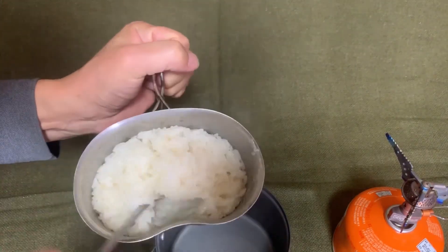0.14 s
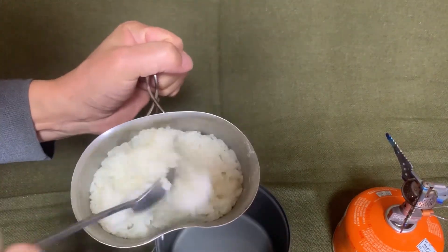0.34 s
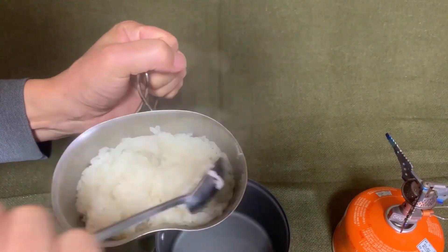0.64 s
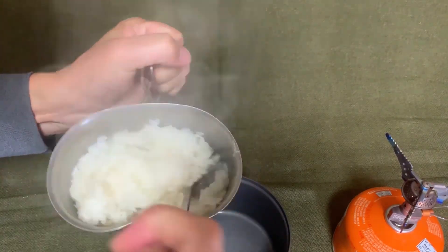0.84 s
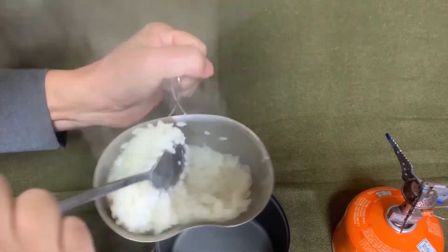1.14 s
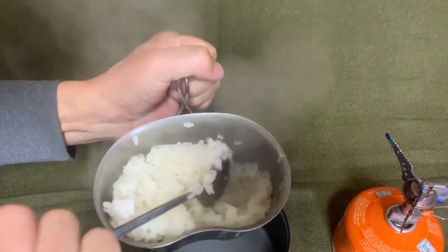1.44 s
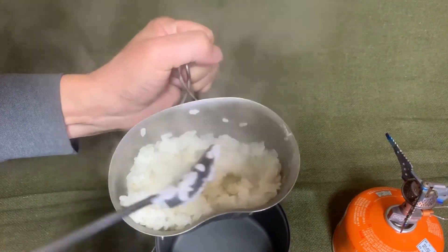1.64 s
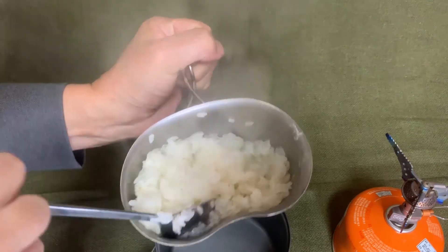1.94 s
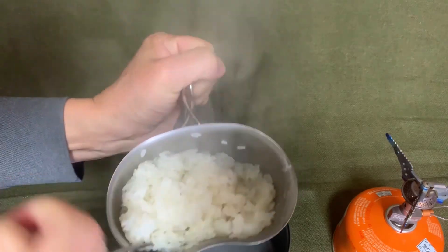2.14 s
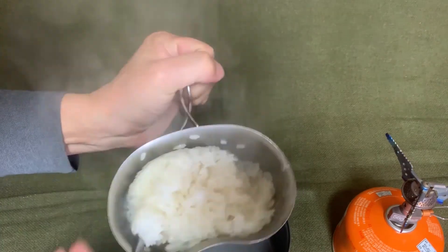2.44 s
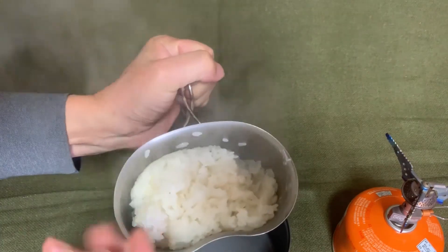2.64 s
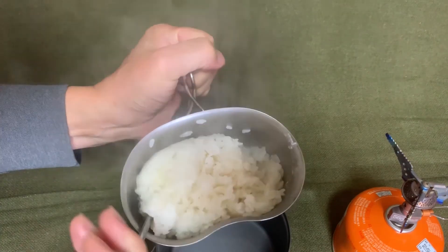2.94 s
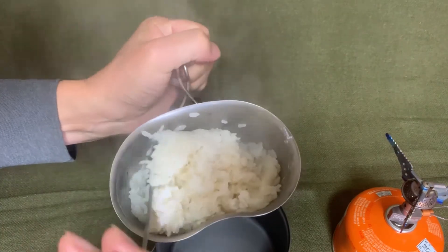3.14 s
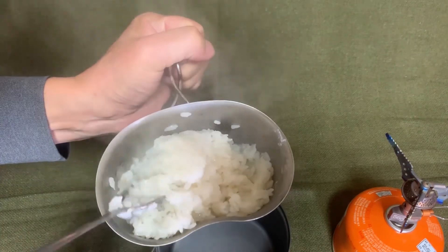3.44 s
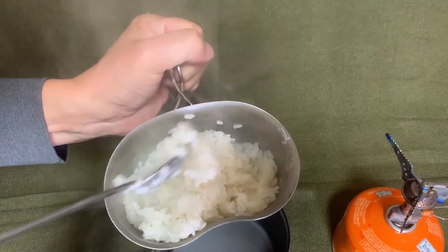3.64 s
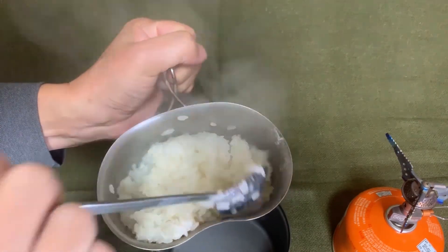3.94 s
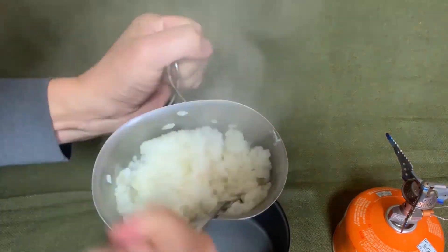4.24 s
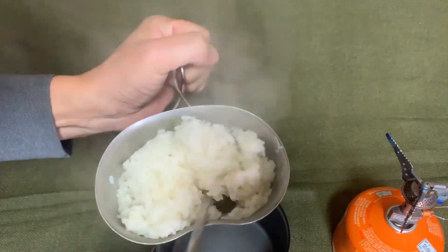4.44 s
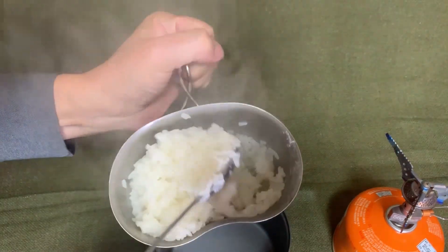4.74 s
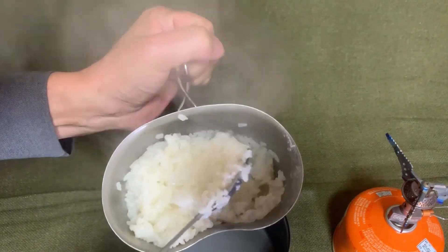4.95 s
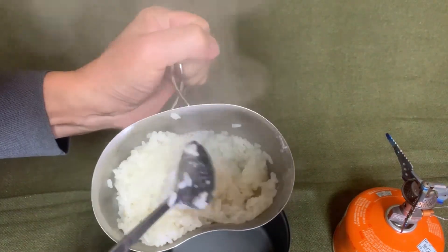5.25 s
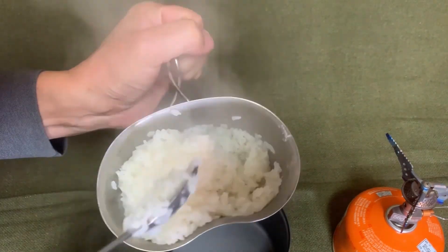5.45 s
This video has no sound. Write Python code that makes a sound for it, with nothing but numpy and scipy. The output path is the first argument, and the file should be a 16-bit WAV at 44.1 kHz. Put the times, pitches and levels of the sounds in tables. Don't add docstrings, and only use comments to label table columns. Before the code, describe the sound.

A spoon clinks hard on a rice-filled metal camping cup, the handle ticks, the base knocks, air hisses out sharply, then a lid snaps shut.

```python
import sys
import numpy as np
from scipy import signal
from scipy.fft import rfft, irfft
from scipy.io import wavfile
from scipy.ndimage import uniform_filter1d

SR = 44100
rng = np.random.default_rng(int(sys.argv[2]) if len(sys.argv) > 2 else 0)


def generate_wav(sig):
    pcm = np.round(np.clip(np.atleast_2d(sig).T, -1, 1) * 32767).astype(np.int16)
    wavfile.write(sys.argv[1], SR, pcm)


def gain_from_db(level_db):
    decades = np.asarray(level_db, float) / 20
    return 10 ** decades


N = 246953
TIME = np.arange(N) / SR


def at_hz(points, hz):
    table = np.array(points)
    return np.interp(np.log(hz), np.log(table[:, 0]), table[:, 1])


def rms_one(x):
    return x / np.sqrt(np.mean(x ** 2) + 1e-20)


def colour(x, spectrum, size=8192):
    level_db = at_hz(spectrum, np.linspace(1, SR / 2, size // 2 + 1))
    cepstrum = irfft(np.log(gain_from_db(level_db)))
    cepstrum[1:size // 2] *= 2
    response = irfft(np.exp(rfft(cepstrum[:size // 2], size)))
    return signal.fftconvolve(x, response / np.linalg.norm(response))[:N]


def drift(rate):
    r = np.exp(-32 * np.pi * rate / SR)
    slow = signal.lfilter([1], [1, -2 * r, r * r], rng.standard_normal(N // 16 + 3001))[3000:]
    return np.interp(np.arange(N) / 16, np.arange(len(slow)), rms_one(slow))


def high_pass(x, order, hz):
    return signal.sosfilt(signal.butter(order, hz, "high", fs=SR, output="sos"), x)


def ring(push, hz, t60):
    r = gain_from_db(-60 / (np.clip(t60, .002, 2) * SR))
    w = 2 * np.pi * hz / SR
    return signal.lfilter([.5, 0, -.5], [1, -2 * r * np.cos(w), r * r], push + 1e-18)


def clicks(times, db):
    out = np.zeros(N)
    np.add.at(out, (np.array(times) * SR).astype(int), gain_from_db(db))
    return out


def burst(x, t60):
    envelope = signal.lfilter([1], [1, -gain_from_db(-60 / (t60 * SR))], x + 1e-18)
    return envelope * rng.standard_normal(N)


def soft(x, hz):
    r = np.exp(-2 * np.pi * hz / SR)
    return signal.lfilter([(1 - r) ** 2], [1, -2 * r, r * r], x)


def strike(hits, modes, damped=False, spread_db=2.0):
    s, db = np.transpose(hits)[:2]
    luck = rng.standard_normal((len(s), 14))
    most_cycles = 55 if damped else np.inf
    out = np.zeros(N)
    for k, (hz, level_db, t60) in enumerate(modes):
        push = clicks(s, db + level_db + spread_db * luck[:, k])
        out += (-1) ** k * ring(push, hz, min(t60, most_cycles / hz))
    return out


def rattle(hits, modes, slip_s):
    s, db = np.transpose(hits)[:2]
    grains = burst(clicks(s, db), slip_s) / np.sqrt(slip_s * SR / 14)
    return sum(gain_from_db(level_db) * ring(grains, hz, t60) for hz, level_db, t60 in modes)


def crack(hits, spectrum, t60):
    s, *db = np.transpose(hits)
    return colour(burst(clicks(s, db[-1]), t60), spectrum)


def spread(hits, spectrum, gain_db):
    s, *db = np.transpose(hits)
    return colour(clicks(s[1:2], db[-1][1:2] + gain_db), spectrum)


def swell(start, rise, hold, sag_db, fall_db):
    t = TIME - start
    late = np.maximum(t - rise, 0)
    drop_db = sag_db * np.minimum(late, hold) + fall_db * np.maximum(late - hold, 0)
    return np.clip(t / rise, 0, 1) ** 2 * gain_from_db(-drop_db)


# (frequency [Hz], t60 [s])
ROOM_T60 = [(100, .3), (600, .33), (1300, .4), (2500, .32), (5000, .32), (8000, .3), (15000, .29)]


def room(x, gap_s=.005):
    t, tail = TIME[:SR // 2], 0
    edges = np.geomspace(60, 18000, 10)
    for low, high in zip(edges, edges[1:]):
        band_pass = signal.butter(2, [low, high], "band", fs=SR, output="sos")
        band = signal.sosfilt(band_pass, rng.standard_normal(len(t)))
        tail = tail + band * gain_from_db(-60 * t / at_hz(ROOM_T60, np.sqrt(low * high)))
    tail = tail * np.clip(t / gap_s - 1, 0, 1)
    return signal.fftconvolve(x, tail / np.linalg.norm(tail))[:N]


# (frequency [Hz], level [dB per Hz])
FLOOR = [(18, -50), (30, 6), (124, -6), (221, -11.5), (328, -11), (473, -13.5), (569, -13), (632, -14),
         (1430, -23.5), (8080, -34), (11400, -43.5), (14400, -37), (16000, -40)]
# (frequency [Hz], level [dB rms])
HUM = [(172.3, -69.5), (328.4, -66), (570.6, -71.5), (689.1, -76), (1319, -80.5), (3095, -82.5),
       (6998, -84.5), (8070, -87), (14153, -101)]
# (frequency [Hz], level [dB rms])
BEAT = [(44.51, -69), (53.01, -73.5), (57.35, -67), (114.67, -65.5), (120.78, -63.5)]


def background():
    out = gain_from_db(-59.5) * rms_one(colour(rng.standard_normal(N), FLOOR))
    for hz, db in HUM:
        level = gain_from_db(db + 0.5 + 2.6 * drift(7.9))
        out += level * np.sin(2 * np.pi * hz * TIME + 0.09 * drift(5.0))
    for hz, db in BEAT:
        level = gain_from_db(db + 4.0 + 0.93 * drift(7.0))
        out += level * np.cos(2 * np.pi * hz * (TIME - .067))
    return out


# (start [s], length [s], dull rub [dB], bright rub [dB])
RUBS = [(-.05, 0.076, -65, -63), (0.125, 0.16, -70, -85), (0.425, 0.27, -88, -74), (0.777, 0.2, -77, -75),
        (0.888, 0.11, -75, -64.5), (1.602, 0.061, -69, -74), (1.804, .03, -73, -73),
        (1.867, 0.03, -64.5, -56.5), (2.002, .08, -72, -74), (2.32, 0.17, -62.5, -63),
        (2.647, 0.14, -66.5, -74), (2.784, 0.29, -64.5, -76.5), (3.022, 0.19, -74, -66),
        (3.264, 0.12, -79, -72), (4.43, 0.11, -77, -74), (4.74, .07, -73.5, -91), (5.21, .05, -81, -83)]
# (frequency [Hz], level [dB per Hz])
DULL = [(410, -31), (700, -5), (848, -1.5), (1290, 1.5), (1580, -1.5), (2550, -1.5), (9000, -19),
        (11700, -43), (19800, -120)]
BRIGHT = [(1760, -38.5), (3000, -4.5), (4760, -3), (6280, 1), (8100, -1.5), (8800, 0.5), (12000, -13),
          (13000, -6), (15600, -5.5)]
# (start [s], end [s], level [dB], lines [Hz])
SING = [
    (.405, .59, -80, [7750, 7900, 9660]),
    (2.335, 2.49, -76, [5400, 7100, 10800, 12800, 13200]),
]


def rubbing():
    dull = colour(rng.standard_normal(N) * gain_from_db(2.0 * drift(40)), DULL)
    bright = colour(rng.standard_normal(N) * gain_from_db(2.0 * drift(40)), BRIGHT)
    out, rise_s = np.zeros(N), 0.038
    for s, length, dull_db, bright_db in RUBS:
        stroke = swell(s, rise_s, max(length - rise_s, 0), sag_db=35, fall_db=152.5)
        out += stroke * (gain_from_db(dull_db) * dull + gain_from_db(bright_db) * bright)
    for start, end, db, lines in SING:
        gate = np.clip(np.minimum(TIME - start, end - TIME) / 0.014, 0, 1)
        grit = rng.standard_normal(N)
        out += gain_from_db(db) * gate * sum(rms_one(ring(grit, hz, t60=0.028)) for hz in lines)
    return out


# (start [s], length [s], from [Hz], to [Hz], level [dB])
WHISTLES = [
    (3.84, .06, 4500, 5200, -61),
    (3.825, .075, 3250, 3500, -61),
    (3.83, 0.07, 2150, 2450, -63),
    (3.78, 0.1, 1150, 1400, -57),
    (4.55, .06, 8700, 7700, -80),
    (4.56, 0.034, 11000, 10400, -82),
]


def whistle():
    out = np.zeros(N)
    rough = drift(200)
    for k, (s, length, from_hz, to_hz, db) in enumerate(WHISTLES):
        along, first = np.linspace(0, 1, int(length * SR)), int(s * SR)
        phase = 2 * np.pi * np.cumsum(from_hz + (to_hz - from_hz) * along) / SR
        own = rough[k * SR // 2:][:len(along)]
        fade = np.sqrt(np.abs(np.sin(np.pi * along)))
        out[first:first + len(along)] += gain_from_db(db) * fade * own * np.cos(phase)
    return out


# (start [s], peak [dB], rise [s], hold [s])
PUFFS = [
    (3.638, -26, 0.00055, 0.081),
    (3.81, -55, 0.064, 0.058),
    (3.895, -39.5, 0.012, 0.033),
]
# (frequency [Hz], level [dB per Hz])
AIR = [(90, -37), (180, -17.5), (340, -4), (560, -4), (850, -8.5), (1150, -1.5), (1570, 2), (3050, 2),
       (8900, -5.5), (10500, -17.5), (12000, -24), (15600, -28.5)]
# (frequency [Hz], level [dB], t60 [s])
SHEET = [(950, -11, .04), (1250, -9, .04), (2350, -6, .03), (3400, -6, .03), (3670, -10, .02),
         (4250, -6, .03), (4750, -4, .03), (5300, -7, .03), (6490, -4, .03), (8500, -5, .02),
         (10400, -7, .02), (12700, -8, .02)]


def puff():
    flow = np.zeros(N)
    for s, db, rise, hold in PUFFS:
        flow += gain_from_db(db) * swell(s, rise, hold, sag_db=63, fall_db=172)
    s, full_db = PUFFS[0][:2]
    lead_s = 0.0019
    flow = flow + gain_from_db(full_db - 18) * (TIME > s - lead_s) * (TIME < s + lead_s)
    below_db = np.clip(20 * np.log10(flow + 1e-9) - full_db, -26, 0)
    grain = gain_from_db(0.5 * drift(430) + 0.78 * drift(71))
    air = rms_one(colour(rng.standard_normal(N) * grain, AIR))
    top = high_pass(air, 2, 10500)
    sheet = np.zeros(N)
    for hz, level_db, t60 in SHEET:
        sheet += gain_from_db(level_db + 4.0 * drift(1.6)) * ring(air, hz, t60)
    bright = gain_from_db(3 + 0.41 * below_db) * top
    singing = gain_from_db(-14 - 0.23 * below_db) * rms_one(sheet)
    return flow * (air + bright + singing)


# (time [s], level [dB])
CATCH = [
    (3.9075, -50),
    (3.9120, -44.5),
    (3.9250, -55),
    (3.9285, -39),
    (3.9460, -59),
    (3.9650, -63),
]
# (frequency [Hz], level [dB], t60 [s])
LATCH = [(2288, -5, .015), (3725, -4, .015), (4300, -2, .015), (4732, -3, .015), (5173, -9, .015),
         (6600, -5, .022), (8425, -8, .02), (8839, -4, .025), (10300, -6, .025), (11430, -14, .02),
         (12690, -8, .02), (13610, -12, .025)]


def catch():
    return rattle(CATCH, LATCH, slip_s=0.015)


# (time [s], peak level [dB])
THUMPS = [(3.639, -38), (3.660, -45), (3.690, -36), (3.9005, -42), (3.912, -39.5), (3.940, -42.5),
          (3.975, -43.5), (4.005, -53), (4.035, -57)]
# (frequency [Hz], level [dB], t60 [s])
HOLLOW = [(265, -7.5, 0.042), (442, -1.5, 0.034), (625, 0.5, 0.023), (944.4, -2.5, 0.14),
          (1158, -1.5, 0.066), (1357, 4, 0.05)]


def thump():
    return soft(strike(THUMPS, HOLLOW), hz=1490)


# (time [s], grit level [dB], ring against grit [dB], rebound against first touch [dB])
NOTCH_OUT = [(0.638, -47.5, -5.5, -13), (1.273, -48, -9.5, -1.5), (2.0617, -47.5, -11.5, -8.5),
             (4.3622, -47, -6.5, -7), (4.8255, -53, -7, 5)]
NOTCH_IN = [(0.0044, -50, -10, -26), (0.7262, -50, -15, 1.5), (1.382, -43.5, -21, -12),
            (2.189, -48, -11.5, -16), (4.415, -48, -16, -5), (4.8984, -46.5, -16, -7)]
STRAY = [(0.6774, -53, -33, -32), (1.8262, -75, -23, -30), (2.2872, -49.5, -22, 4), (2.3204, -72, -19, -30),
         (4.6644, -77.5, -14, -29), (5.243, -66.5, -9, -30), (5.5874, -49.5, -20, -27)]
OUT_SHARES = [-17.5, -0.8, -30, -26]
IN_SHARES = [5, -12, -2, 1]
STRAY_SHARES = [-15, -12, 6, 4]
# (frequency [Hz], t60 [s])
WIRE = [(5350, .01), (8080, .03), (12300, .01), (14650, .015)]
# (frequency [Hz], level [dB per Hz])
TICK_CRACK = [(880, -55), (1500, -13.5), (2500, -9), (3620, -8.5), (5410, -4.5), (9750, -8), (14900, -27),
              (15600, -9)]


def handle():
    touches = []
    for rows, shares in [(NOTCH_OUT, OUT_SHARES), (NOTCH_IN, IN_SHARES), (STRAY, STRAY_SHARES)]:
        for s, db, ring_db, rebound_db in rows:
            wire_db = ring_db + np.array(shares)
            touches.append((s, db, *(wire_db - 2.5)))
            touches.append((min(s + .012, TIME[-1]), db + rebound_db, *wire_db))
    s, db, *shares = np.transpose(touches)
    slip_t60 = .13
    out = colour(burst(soft(clicks(s, db - 12.5), hz=202), slip_t60), TICK_CRACK)
    for share, (hz, t60) in zip(shares, WIRE):
        rub = burst(soft(clicks(s, db + share - 15), hz=149), 0.46 * slip_t60)
        out += ring(rub, hz, t60)
    return out


# (time [s], ring level [dB], grit level [dB])
TAPS = [
    (1.4710, -40, -48),
    (1.4770, -55, -39.5),
    (1.4860, -55, -44),
    (1.4980, -60, -50),
    (1.5100, -61, -50),
    (1.5200, -70, -58),
]
# (frequency [Hz], level [dB], t60 [s])
SPOON = [(5250, -8, .008), (5520, -4, 0.012), (5900, -5, .01), (6309, -10, 0.012), (7300, -10, .008),
         (7919, 5, 0.035), (8656, -8, 0.02), (9300, -9, 0.02), (9835, -7, .015), (11220, -16, 0.015),
         (13560, -12, .012), (14590, -18, .012)]
# (time [s], ring level [dB], grit level [dB])
SKID = [
    (1.5715, -55, -60),
    (1.5740, -50, -56),
    (1.5765, -45, -50),
    (1.5785, -44, -50),
    (1.5870, -56, -60),
]
# (frequency [Hz], level [dB], t60 [s])
SKID_RING = [(5300, -8, .008), (6412, -13, .01), (7897, 1, .015), (8210, -1, .015), (8651, -2, .015),
             (9825, -7, .008), (10200, -5, .01), (12070, -12, .008), (13000, -7, .008), (14400, -12, .008)]
# (frequency [Hz], level [dB per Hz])
SPOON_CRACK = [(880, -47), (1500, -14), (4300, -34), (5300, -21), (6850, -15), (7930, -6), (10300, -12),
               (11500, -14), (15600, -23)]


def spoon_taps():
    rings = rattle(TAPS, SPOON, slip_s=0.03) + rattle(SKID, SKID_RING, slip_s=0.01)
    return rings + crack(TAPS + SKID, SPOON_CRACK, t60=0.019)


# (time [s], peak level [dB])
SHUDDERS = [
    (1.078, -32),
    (2.33, -37),
]


def shudder():
    table_top = [(46.5, -8.0, 0.67), (62, -8.0, .3)]   # (frequency [Hz], level [dB], t60 [s])
    return soft(strike(SHUDDERS, table_top), hz=89.3)


# (time [s], peak level [dB])
KNOCKS = [
    (2.3071, -18),
    (2.3087, -19),
    (2.3219, -17),
]
# (frequency [Hz], level [dB], t60 [s])
BASE = [(459, -8, 0.043), (647, 2.5, 0.033), (302, -9, 0.069), (170, -10.5, 0.072), (394, -12, 0.088),
        (1280, -29, 0.16), (673, -25.5, 0.34), (775, -22.5, 0.27), (540, -29, 0.088), (640, -37, .3)]
# (time [s], peak level [dB])
BUMPS = [(.665, -52), (1.582, -45), (1.47, -54), (2.09, -54), (2.47, -50), (4.44, -58)]
# (frequency [Hz], level [dB], t60 [s])
NUDGE = [(570, -10, .05), (722, -1, .09), (980, -14, .03)]
# (time [s], level [dB])
KNOCK_GRIT = [
    (2.3060, -39),
    (2.3205, -42.5),
]
# (frequency [Hz], level [dB per Hz])
RIM_TAIL = [(290, -44), (500, 1), (864, -8), (1090, 3), (1510, -9.5), (3920, 4), (5860, -13), (6300, 0.5),
            (11700, -9), (15600, -4)]
# (frequency [Hz], level [dB], t60 [s])
LANDING = [(1690, -20, 0.045), (2540, 3, .02), (3700, -9, 0.036), (5260, -5, 0.047), (6950, -6, 0.03)]


def knock():
    base = soft(strike(KNOCKS, BASE, spread_db=1.0), hz=1210)
    nudges = soft(strike(BUMPS, NUDGE), hz=930)
    click = crack(KNOCK_GRIT, RIM_TAIL, t60=0.0051)
    chime = gain_from_db(-13) * strike(KNOCK_GRIT, LANDING)
    return base + nudges + click + chime


# (time [s], ring level [dB], grit level [dB])
SNAPS = [
    (5.3487, -21, -14),
    (5.3492, -18, -12),
    (5.3501, -11, -12),
    (5.3608, -22, -34),
    (5.3695, -26, -26),
    (5.3780, -28, -30),
]
# (frequency [Hz], level [dB], t60 [s])
LID = [(324, -18, 0.02), (650, -13.5, 0.013), (1237, -11, 0.04), (1365, -4, 0.018), (1790, -8, 0.012),
       (2640, -7, 0.008), (3670, -10, 0.008), (4160, -11, 0.012), (4890, -16, 0.0064), (6500, -10, 0.006),
       (8050, -17, .004), (9580, -11, .005), (10040, -13, .005), (13200, -13, .005)]
# (frequency [Hz], level [dB per Hz])
LID_CRACK = [(240, -64), (400, -40), (1300, -1), (1900, -3), (2640, 0), (5590, -6), (7250, -12), (9600, -2),
             (11500, -8), (15600, -8)]


def lid_snap():
    rings = strike(SNAPS, LID, damped=True, spread_db=1.0)
    sharp = gain_from_db(-1.0) * crack(SNAPS, LID_CRACK, t60=0.0049)
    return rings + sharp + gain_from_db(-13.5) * crack(SNAPS, LID_CRACK, t60=0.05)


# (frequency [Hz], level [dB per Hz])
LID_TAIL = [(120, -56), (200, -25), (322, -14), (946, -16), (1240, -0.5), (1580, -8), (1790, -4),
            (2400, -13), (15800, -19.5)]


def lid_into_room():
    return spread(SNAPS, LID_TAIL, gain_db=15)


# (time [s], peak level [dB])
THUDS = [
    (1.0413, -23),
    (1.0480, -25),
]
# (frequency [Hz], level [dB], t60 [s])
WALL = [(84.8, -10, 0.11), (111, -4, 0.057), (201, -6.5, 0.12), (313, -7.5, 0.043), (374, -6, 0.13),
        (707, -17.5, 0.094)]


def thud():
    return gain_from_db(0.5) * soft(strike(THUDS, WALL), hz=1460)


# (time [s], ring level [dB], grit level [dB])
CLINKS = [
    (1.0411, -38, -30),
    (1.0438, -27, -19),
    (1.0455, -21, -13),
    (1.0466, -23, -16),
    (1.0488, -31, -27),
]
# (frequency [Hz], level [dB], t60 [s])
RIM = [(936, -13.5, 0.015), (1900, -13.5, 0.0097), (2550, -20, .01), (3030, -10, 0.02),
       (3640, -12.5, 0.011), (4790, -6.5, 0.012), (5300, -9.5, 0.012), (6680, -5.5, 0.012),
       (7550, -7, 0.009), (9200, -8.5, 0.008), (11500, -19, .006), (13100, 5, 0.006), (14500, -10, .005),
       (15300, -2, 0.006)]
# (frequency [Hz], level [dB per Hz])
RIM_CRACK = [(530, -78), (900, -7.5), (4730, -3), (8490, -7), (9910, 6.5), (11600, -8), (15600, 4.5)]
# (time [s], ring level [dB], grit level [dB])
RETAPS = [
    (.678, -57, -57),
    (1.8262, -61, -60),
    (1.1825, -45, -44),
    (1.1850, -46, -50),
    (2.5296, -61, -66),
]
# (frequency [Hz], level [dB], t60 [s])
EDGE = [(990, -4, .02), (3450, -11, .01), (4250, -6, .011), (6350, -4, .018), (7800, -10, .01),
        (2200, -13, .01), (5300, -13, .01)]
# (time [s], level [dB])
WOBBLE = [
    (1.0510, -35),
    (1.0545, -37),
    (1.0815, -40),
    (1.0870, -42),
    (1.1000, -48),
]
# (frequency [Hz], level [dB], t60 [s])
WALL_RING = [(3190, -3, .012), (3900, -4, .01), (4750, -9, .01), (1500, -10, .01), (2300, -9, .01)]


def clink():
    rings = strike(CLINKS, RIM, damped=True) + gain_from_db(5.0) * strike(RETAPS, EDGE)
    rocking = rattle(WOBBLE, WALL_RING, slip_s=.012)
    grit = gain_from_db(-5.5) * crack(CLINKS, RIM_CRACK, t60=0.011) + crack(RETAPS, RIM_CRACK, t60=0.03)
    return rings + rocking + grit


def clink_into_room():
    return spread(CLINKS, RIM_TAIL, gain_db=9)


ROOM_DB = {"clink": -10, "tap": -6, "tick": -2, "knock": -10, "snap": -14}


def scene():
    weaker_db = -4
    parts = [(clink(), ROOM_DB["clink"] + weaker_db),
             (lid_snap(), ROOM_DB["snap"] + weaker_db),
             (spoon_taps(), ROOM_DB["tap"]),
             (handle(), ROOM_DB["tick"]),
             (knock(), ROOM_DB["knock"]),
             (thud(), -12), (catch(), -2.5), (thump(), -3)]
    close = sum(x for x, db in parts)
    to_room = clink_into_room() + lid_into_room() + sum(gain_from_db(db) * x for x, db in parts)
    air = puff() + whistle()
    return (close + shudder() + room(to_room) + air + rubbing() + background())[None]


def low_pass(x):
    return signal.sosfilt(signal.butter(12, 17020, fs=SR, output="sos"), x)


def record(dry):
    overload = .9
    heard = high_pass(overload * np.tanh(dry / overload), 3, 36)
    top = signal.sosfilt(signal.cheby2(10, 40, 15700, "high", fs=SR, output="sos"), heard)
    power = np.abs(uniform_filter1d(top ** 2, size=300)) ** 2
    opening = power / (power + gain_from_db(3.1 * -52))
    cut = signal.sosfilt(signal.cheby2(14, 50, 16120, fs=SR, output="sos"), heard)
    cut = cut + gain_from_db(-9.0) * top * opening
    mix = signal.sosfilt(signal.cheby2(16, 60, 17050, fs=SR, output="sos"), cut)
    return low_pass(mix)


dry = scene()
out = record(dry)
generate_wav(out)
```